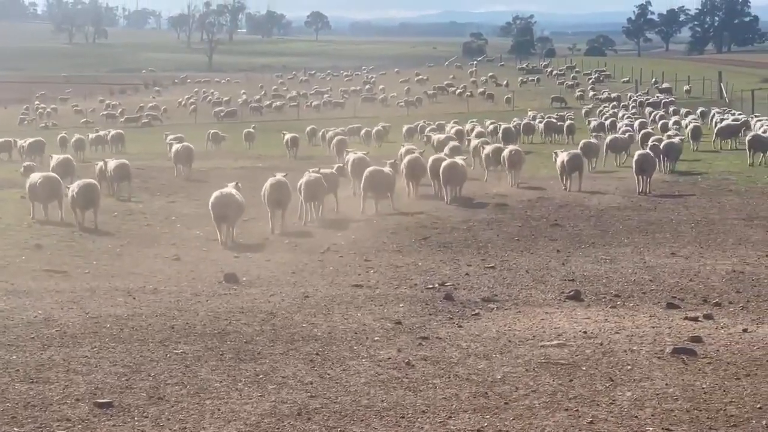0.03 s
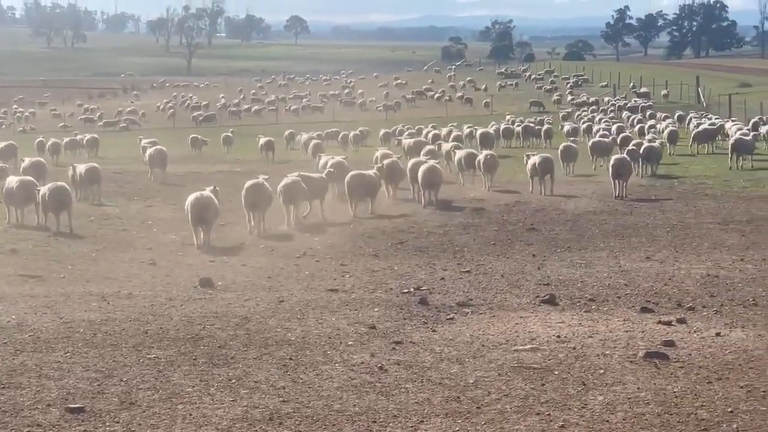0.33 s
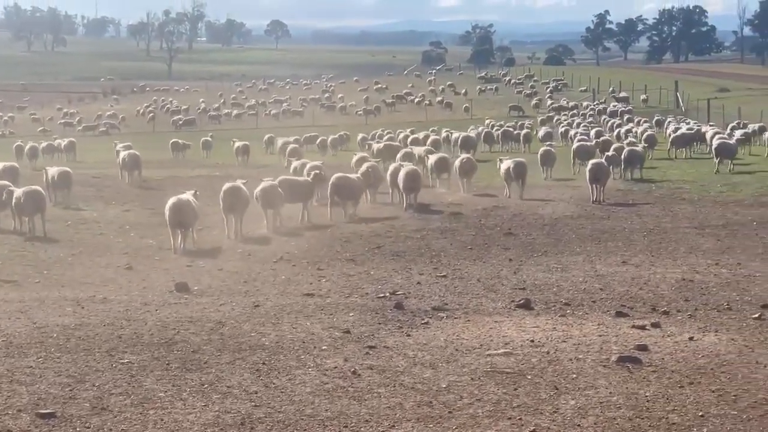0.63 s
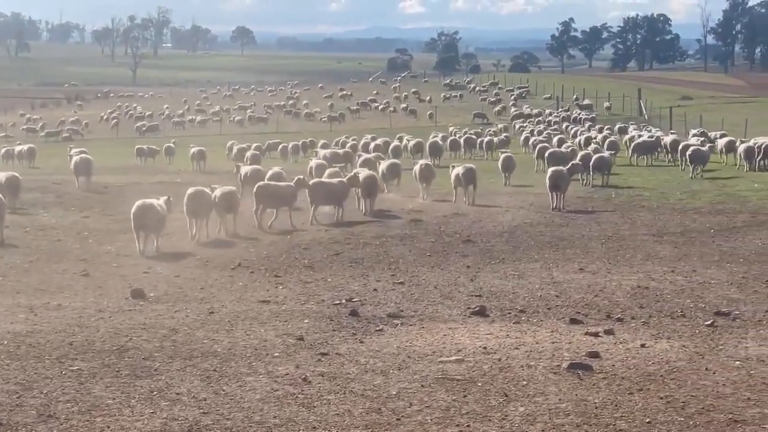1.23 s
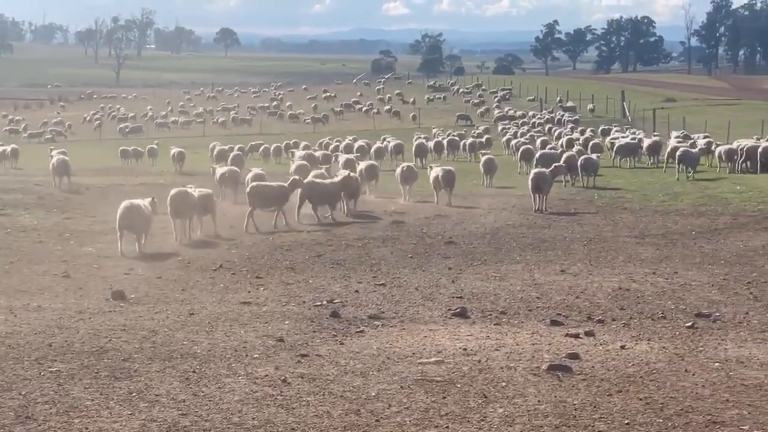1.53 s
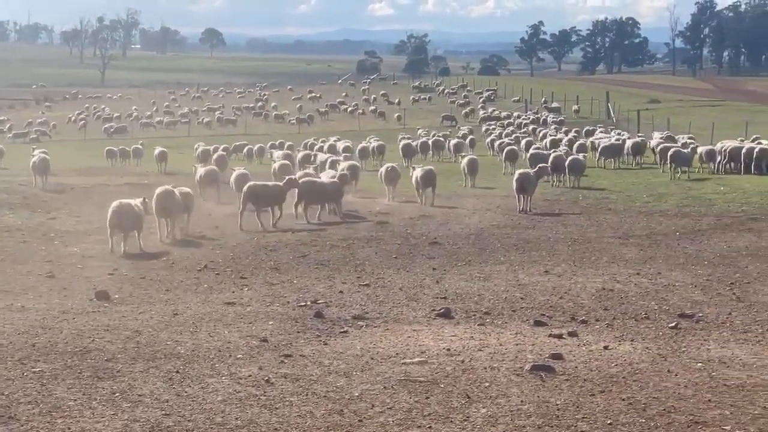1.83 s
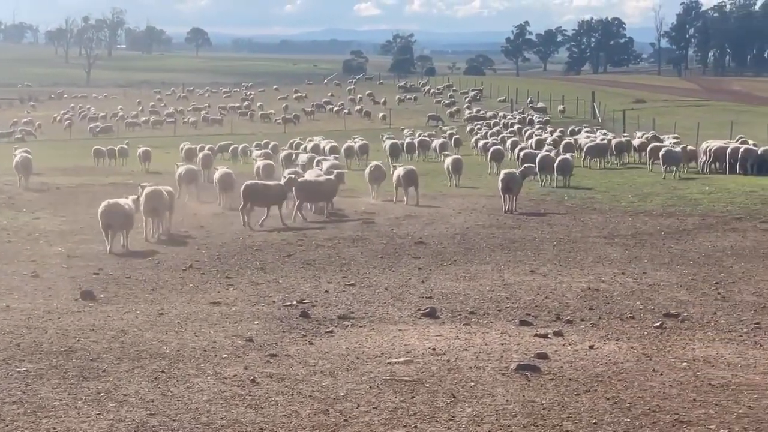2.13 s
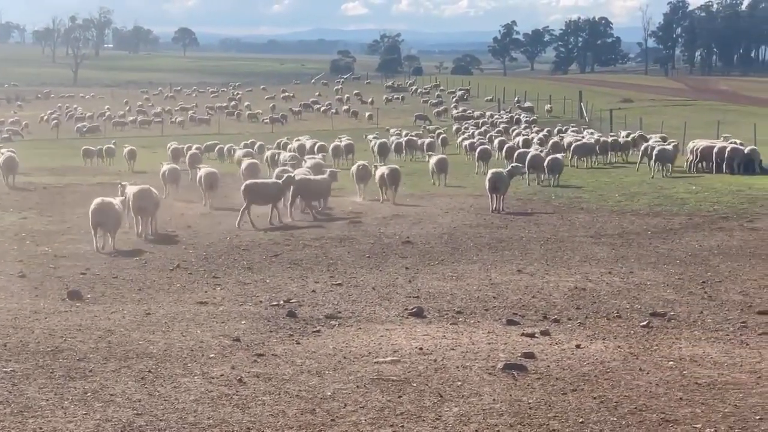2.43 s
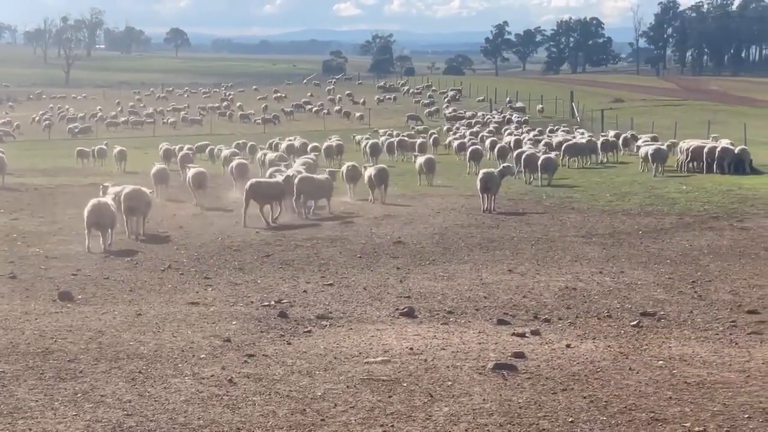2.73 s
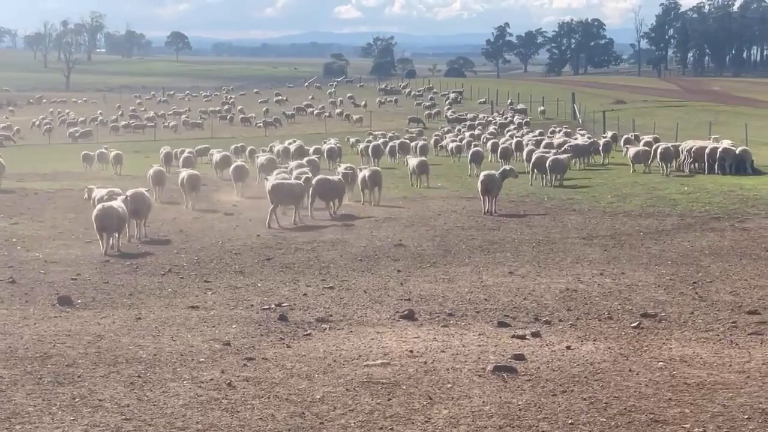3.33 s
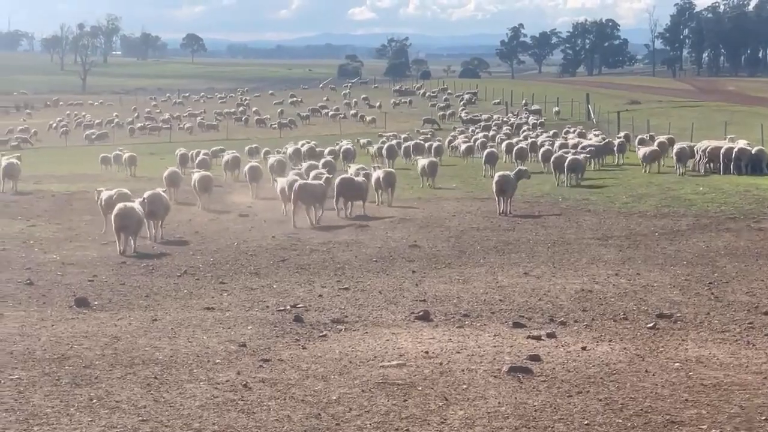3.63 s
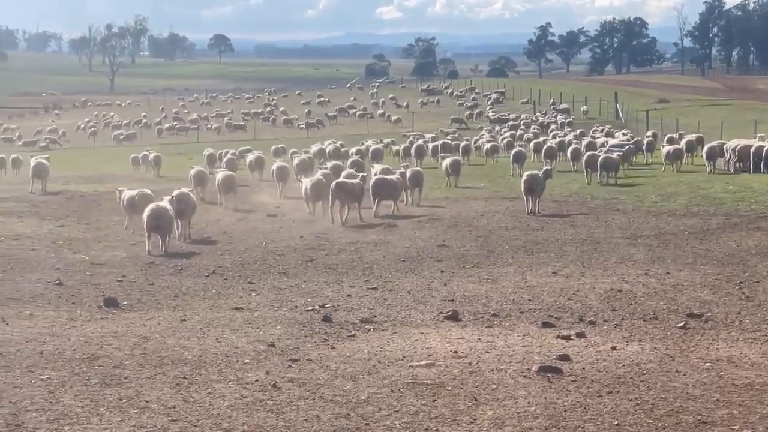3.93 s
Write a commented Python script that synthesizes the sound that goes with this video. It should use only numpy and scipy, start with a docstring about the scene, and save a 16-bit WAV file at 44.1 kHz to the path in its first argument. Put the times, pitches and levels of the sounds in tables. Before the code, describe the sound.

Sheep bleat across an open paddock, hoarse and nasal. One call lasts until about 0.7 seconds, another starts around 1.1, then four more overlap from 1.6 to about 3, the last trailing off softly toward 4. Wind rumbles and buffets the microphone throughout. Small, dull knocks sound close by near 0.5, 1.7 and 3.5 seconds, with very faint distant bird chirps behind.

```python
"""Sheep bleat across an open paddock: six hoarse, nasal, overlapping calls, the last trailing off.
In each, vocal-fold pulses and puffs of air ring a throat whose resonances rise as the mouth opens.
Wind buffets the microphone; a few small knocks and soft scuffs on dry earth sound close by.
Behind them: a faint far bird, insect-like ticking, a wash of flock and breeze, a thin high hiss."""
import sys
import numpy as np
from scipy import signal
from scipy.fft import rfft, irfft
from scipy.io import wavfile
from scipy.ndimage import map_coordinates

SR = 44100
rng = np.random.default_rng(int(sys.argv[2]) if len(sys.argv) > 2 else 0)


def output_pcm(signal):
    """Save a mono or channel-first signal as 16-bit PCM at the path in sys.argv[1].

    Samples are clipped to [-1, 1] before scaling.
    """
    pcm = np.clip(np.atleast_2d(signal).T, -1, 1) * 32767
    wavfile.write(sys.argv[1], SR, np.round(pcm).astype(np.int16))


N = 176400


def bleat(curve, throat, jitter=.0038, jitter_hz=45, shimmer=.2, puff_cycles=.55,
          quaver_db=1.3, quaver_hz=26, quaver_mouth=.007):
    """Vocal-fold pulses and air puffs ring a throat whose resonances rise as the mouth opens."""
    time_s, pitch_hz, level_db, roughness, mouth = np.transpose(curve)
    t = np.arange(time_s[0], time_s[-1], 1 / SR)
    n = np.arange(len(t))
    rough = np.clip(np.interp(t, time_s, roughness), 0, 1)
    hz = np.interp(t, time_s, pitch_hz) * (1 + jitter * (1 + 2 * rough) * wander(jitter_hz)[n])
    cycles = np.cumsum(hz) / SR
    phase = cycles % 1 - .5
    folds = np.sinc(phase * SR / hz / 2) * np.cos(np.pi * phase) ** 2
    folds *= 1 + shimmer * rng.standard_normal(SR)[cycles.astype(int)]
    puffs = (.3 + np.exp(-((cycles + .5) % 1) / puff_cycles)) * rng.standard_normal(len(t))
    drive = np.sqrt(1 - rough) * unit(folds - folds.mean()) + np.sqrt(rough) * unit(puffs)
    # a faster clock lifts every resonance
    clock = np.cumsum(np.interp(t, time_s, mouth) * (1 + quaver_mouth * wander(quaver_hz)[n]))
    warped = map_coordinates(drive, [np.interp(np.arange(clock[-1]), clock, n)])
    voice = unit(map_coordinates(colour(warped, throat), [clock]))
    effort_db = np.interp(t, time_s, level_db) + quaver_db * wander(quaver_hz)[n]
    out = np.zeros(N)
    add(out, time_s[0], amp(effort_db) * voice)
    return out


def flock(field_db=-9, field_t60_s=.7, rasp_hz=5100):
    """Six bleats with bright rasp and outdoor scatter, as they reach the two microphone ports."""
    # calls: time_s, pitch_hz, level_db, roughness (0-1), mouth (factor on the resonances)
    bleat_1 = [(.06, 159.9, -94, 0.3, 0.85), (.085, 163, -74, .7, 0.86), (.13, 167.8, -69.5, 0.83, 1.06),
               (.18, 174.6, -63, 0.17, 0.94), (.255, 179.3, -65, 0.14, 1.044), (.32, 175, -61.5, 0.3, 0.98),
               (.39, 168.3, -62.5, 0.29, 0.99), (.46, 167.2, -62, 0.31, 1.014),
               (.56, 159.9, -60, 0.5, 0.99), (.635, 160.7, -60, 0.8, 1.01), (.68, 147.5, -71.5, 0.5, 0.93)]
    bleat_2 = [(1.06, 154, -86, 0.88, 0.82), (1.1, 160.1, -74.5, 0.53, .92),
               (1.16, 171.1, -68.5, .08, 0.94), (1.22, 169.9, -67, 0.11, 1.03),
               (1.3, 167.4, -65.5, .06, 0.97), (1.4, 160.9, -66.5, 0.33, 1.02),
               (1.52, 154.7, -66.5, 0.47, 1.014), (1.63, 149.7, -66, 0.96, 1.01),
               (1.74, 141.8, -72, 0.69, 1.09)]
    bleat_3 = [(1.58, 160.2, -73, 1, 0.85), (1.66, 167.6, -69, 0.14, .96),
               (1.72, 180.1, -66.5, 0.06, 0.964), (1.76, 183.3, -65.5, 0.022, 1.01),
               (1.85, 180.1, -63.5, 0.071, 0.994), (1.95, 170, -65.5, 0.17, 1.01),
               (2.03, 162.7, -67.5, 0.36, 1.015), (2.12, 149.8, -72, 0.68, 1.1),
               (2.22, 140, -83.5, 0.89, 0.62)]
    bleat_4 = [(1.98, 150.9, -75.5, .4, 0.87), (2.05, 155, -69, 0.11, 0.96),
               (2.12, 152.4, -63, 0.033, 0.98), (2.2, 151.5, -63, 0.04, 0.99),
               (2.3, 148.2, -68, 0.13, 0.97), (2.42, 146, -69, 0.13, 0.98), (2.53, 139, -72, 0.15, 1),
               (2.66, 129.5, -73, 0.44, 0.936), (2.8, 122, -71.5, 0.3, 1)]
    bleat_5 = [(2.24, 150.4, -74, 0.56, .94), (2.32, 153.4, -66.5, 0.59, .96),
               (2.45, 151.6, -64.5, 0.57, 1), (2.6, 148.3, -66.5, 0.31, 0.94),
               (2.69, 143.6, -70.5, 0.074, 0.99), (2.75, 141.3, -65.5, 0.023, 1.05),
               (2.85, 140.5, -66, .03, 0.98), (2.95, 137, -71, 0.061, 0.95), (3.1, 137, -74.5, 0.066, .97),
               (3.25, 134.7, -84.5, 0.058, 0.94), (3.7, 133.6, -85.5, 0.091, 0.91),
               (4, 133.7, -93.5, .2, 0.85)]
    bleat_6 = [(2.28, 187.7, -78, .8, 0.97), (2.38, 199.5, -75.5, 0.6, 1), (2.48, 196.7, -71.5, 0.54, 1),
               (2.58, 190, -77, 0.49, 0.96), (2.7, 172, -83.5, 1, 0.88)]
    # throat and mouth responses: freq_hz, gain_db
    throat_1 = [(400, -34), (1020, -12), (1390, 10.5), (1620, -4), (1850, -2), (2150, 9), (2330, -5.5),
                (2500, -5.5), (2750, -21), (2980, -9.5), (3250, -20.5), (3530, -1), (3800, -22),
                (4300, -41.5), (5500, -28), (6300, -10.5), (7800, -49.5)]
    throat_2 = [(400, -38), (900, -19), (1190, 6.5), (1380, -5), (1620, -6), (1900, 8), (2300, -21.5),
                (2560, -7), (2700, -22.5), (3020, 1), (3400, -32), (4600, -34), (7000, -52.5)]
    throat_3 = [(400, -40.5), (1020, -8.5), (1360, 15), (1680, -10), (2060, 15.5), (2450, -12), (2800, -12),
                (3350, -2.5), (3900, -48), (5400, -36), (6050, -4.5), (6450, -22), (7400, -52)]
    throat_4 = [(400, -54), (1020, -6), (1360, 15), (1620, -11), (2120, 13), (2500, -6.5), (2950, -16.5),
                (3350, -2.5), (3850, -17), (4300, -11.5), (5300, -38.5), (6300, -8), (6900, -27.5),
                (7400, -15.5), (8200, -54.5)]
    throat_5 = [(400, -40.5), (900, -23), (1210, 3.5), (1400, -10), (1800, 4), (2100, -8.5), (2400, -33),
                (2980, -6.5), (3450, -42.5), (4200, -22.5), (5000, -49.5), (7000, -49.5)]
    throat_6 = [(400, -41), (1000, -11.5), (1450, -0.5), (1700, -8.5), (2080, 0.5), (2350, -9), (2650, 6),
                (3000, -17), (3400, 0), (3900, -17), (4350, -7.5), (5000, -34), (7000, -54.5)]
    # treble above rasp_hz: time_s, gain_db
    rasp_gain = [(.1, -8), (.3, -4), (.62, -6), (.75, -11), (1.7, -22.5), (1.85, -5), (2.08, 9), (2.16, 2),
                 (2.26, -13), (2.5, -28)]
    # port balance: freq_hz, left_minus_right_db
    pan = [(500, 0), (1000, -3), (1350, -5), (1850, -3), (2050, -.2), (6000, 0)]
    # port phase: freq_hz, left_lead_rad
    lead = [(500, -.5), (1000, -2.6), (1400, -1.9), (1800, 0), (3000, 0)]
    calls = (bleat(bleat_1, throat_1) + bleat(bleat_2, throat_2) + bleat(bleat_3, throat_3)
             + bleat(bleat_4, throat_4) + bleat(bleat_5, throat_5) + bleat(bleat_6, throat_6))
    calls += amp(field_db) * scatter(calls, field_t60_s)
    rasp = signal.sosfiltfilt(signal.butter(4, rasp_hz, "high", fs=SR, output="sos"), calls)
    calls += rasp * (level(rasp_gain) - 1)
    hz = np.fft.rfftfreq(N, 1 / SR)
    left = amp(read(pan, hz) / 2) * np.exp(.5j * read(lead, hz))
    return irfft(rfft(calls) * np.array([left, 1 / left]), N)


def wind(flutter_db=2.5, spread=.35):
    """Wind on the microphone: lumpy rumble, plus buffets that strike the two ports unequally."""
    # rumble spectrum: freq_hz, density_db
    rumble = [(15, -40), (28, -23), (45, 4), (68, 2), (100, -3), (135, -11), (200, -20), (300, -28.5),
              (450, -37), (800, -49.5), (2000, -83.5)]
    # rumble strength: time_s, level_db
    strength = [(0, -39), (.6, -48), (1.1, -44), (1.6, -48.5), (2.1, -47), (2.5, -45), (2.9, -43),
                (3.15, -46), (3.7, -44.5), (4, -50)]
    # buffets: centre_s, level_db, pitch_hz, half_width_s
    buffets = [(0.034, -32, 81, 0.0073), (0.139, -31.5, 68, 0.0071), (0.245, -33, 78, 0.018),
               (0.387, -38, 72.7, 0.019), (.59, -39.5, 132, 0.011), (0.636, -41.5, 101.6, 0.019),
               (0.852, -38.5, 69.7, 0.038), (0.953, -25.5, 97, 0.0077), (0.978, -31.5, 68, 0.014),
               (1.136, -34.5, 53, 0.024), (1.235, -31.5, 53.6, 0.024), (1.366, -37, 70, 0.022),
               (1.46, -34.5, 72, 0.014), (1.6, -38.5, 63, 0.018), (1.681, -34, 57.3, 0.02),
               (1.672, -40, 131, 0.016), (1.758, -29.5, 67.3, 0.019), (1.745, -37, 131.4, 0.0087),
               (2.265, -34.5, 61.3, 0.03), (2.419, -31, 64.4, 0.0074), (2.698, -35.5, 54, 0.031),
               (2.86, -47, 150, 0.024), (2.894, -32.5, 74, 0.023), (3.271, -34.5, 52.3, 0.019),
               (3.326, -37, 64, 0.011), (3.463, -35.5, 69, 0.023), (3.687, -37.5, 55.2, 0.039)]
    out = noise(rumble, correlation=.72) * level(strength) * unit(amp(flutter_db * wander(hz=23.6)))
    for centre_s, level_db, pitch_hz, half_width_s in buffets:
        mid = burst(pitch_hz, half_width_s)
        side = spread * burst(pitch_hz, half_width_s)
        add(out, centre_s - .5, amp(level_db) * np.array([mid + side, mid - side]))
    return out


def knocks(tail_t60_s=.16, click_decay_s=.0055, click_lead_s=.0026):
    """Short dull knocks, each with a click in front and a brief tail."""
    # knocks: centre_s, level_db, pitch_hz, half_width_s, left_minus_right_db, tail_rel_db, click_rel_db
    hits = [(0.5198, -36.5, 1140, 0.0015, -15.5, -0.5, -58), (1.739, -36, 180, 0.0061, 3, -20, -34),
            (1.735, -42, 355, 0.0043, 4.5, -31, -25), (3.422, -62, 770, 0.0015, 0, -5.5, -29),
            (3.465, -42.5, 855, 0.0024, 5.5, -14.5, -9.5), (3.469, -50, 552, 0.0035, 1, -9, -29),
            (3.545, -44, 526, 0.0025, 4, -11, -51)]
    # click spectrum: freq_hz, gain_db
    click_spectrum = [(300, -4.5), (1200, 8.5), (3500, -6.5), (6000, -29), (11000, -40.5)]
    out, t = np.zeros((2, N)), np.arange(SR) / SR
    for centre_s, level_db, pitch_hz, half_width_s, pan_db, tail_rel_db, click_rel_db in hits:
        body = amp(level_db) * burst(pitch_hz, half_width_s)
        tails = np.array([scatter(body, tail_t60_s), scatter(body, tail_t60_s)])
        add(out, centre_s - .5, body * amp([[pan_db / 2], [-pan_db / 2]]) + amp(tail_rel_db) * tails)
        click = unit(colour(rng.standard_normal(SR), click_spectrum)) * np.exp(-t / click_decay_s)
        add(out, centre_s - click_lead_s, amp(level_db + click_rel_db) * click)
    return out


def scuffs(grain_db=1.2):
    """Soft scuffs on dry earth: brief swells of grainy noise."""
    # scuffs: centre_s, half_width_s, level_db, peak_hz
    swells = [(0.55, 0.043, -62.5, 1010), (0.625, 0.061, -65, 448), (0.629, 0.028, -65, 1700),
              (3.591, 0.13, -74, 887), (3.773, 0.1, -76, 904)]
    t, out = np.arange(N) / SR, np.zeros((2, N))
    for centre_s, half_width_s, level_db, hz in swells:
        spectrum = [(hz / 4, -14), (hz, 0), (hz * 1.16, -8), (hz * 3, -30), (hz * 7, -70)]
        envelope = amp(level_db) * np.exp(-((t - centre_s) / half_width_s) ** 2)
        out += noise(spectrum, correlation=.9) * envelope
    return out * amp(grain_db * wander(hz=196))


def bird(wobble_depth=.027, tail_db=-2):
    """Faint sliding whistles, blurred by distance."""
    # chirps: start_s, length_s, from_hz, to_hz, level_db
    chirps = [(0.17, 0.039, 4100, 3700, -80), (0.747, .12, 3730, 2330, -76.5),
              (0.898, 0.043, 3350, 2970, -83), (0.966, 0.051, 3300, 2780, -85.5),
              (1.226, .03, 3500, 3850, -75.5), (1.273, 0.033, 3600, 4000, -77.5),
              (1.358, 0.03, 4250, 3860, -81.5), (1.417, 0.052, 3700, 3850, -82),
              (1.585, 0.067, 3900, 3480, -76.5), (2.469, 0.075, 3300, 2600, -74),
              (3.372, 0.022, 3100, 3460, -75), (3.751, 0.14, 2600, 2270, -78)]
    out, wobble = np.zeros(N), wander(hz=142)
    for start_s, length_s, from_hz, to_hz, level_db in chirps:
        progress = np.arange(0, 1, 1 / (length_s * SR))
        hz = from_hz + (to_hz - from_hz) * progress
        hz *= 1 + wobble_depth * np.roll(wobble, -round(start_s * SR))[:len(hz)]
        whistle = np.sin(2 * np.pi * np.cumsum(hz) / SR)
        add(out, start_s, amp(level_db) * np.sin(np.pi * progress) * whistle)
    return out + amp(tail_db) * scatter(out, t60_s=.23)


def ticking(pitch_hz=9900, fall_hz_per_s=26000, half_width_s=.01,
            period_s=.083, jitter_s=.006, spread_db=2.8):
    """A loose run of tiny fizzy ticks, each falling in pitch, like an insect in the grass."""
    # tick strength: time_s, level_db
    strength = [(0, -89.5), (1.2, -85), (2.5, -97.5), (2.95, -79), (3.6, -81), (4, -87)]
    t, out = np.arange(-period_s / 2, period_s / 2, 1 / SR), np.zeros((2, N))
    cycles = np.cumsum(pitch_hz - fall_hz_per_s * t) / SR
    tick = np.exp(-(t / half_width_s) ** 2) * np.cos(2 * np.pi * cycles)
    for centre_s in np.arange(0, N / SR, period_s):
        late, loud = rng.standard_normal(2)
        add(out, centre_s + t[0] + jitter_s * late, amp(spread_db * loud) * tick)
    fizz = noise([(200, -3.5), (450, -7.5), (1000, -38.5)], correlation=.87)
    return out * fizz * level(strength)


def wash(flutter_db=1.4):
    """Distant noise of the moving flock and the breeze."""
    # wash spectrum: freq_hz, density_db
    spectrum = [(100, -15.5), (300, 5), (550, -2), (750, 1.5), (1100, 4.5), (1600, -5), (2200, -9),
                (3200, -13.5), (4300, -21), (6500, -22.5), (8000, -32), (12000, -65)]
    # wash strength: time_s, level_db
    strength = [(0, -81.5), (.45, -71), (.62, -69), (.78, -70.5), (1.05, -74), (1.8, -73), (2.5, -72),
                (3.2, -75.5), (3.7, -77.5), (4, -81)]
    # left-right likeness: freq_hz, correlation
    likeness = [(300, 0.21), (600, 0.19), (980, -0.6), (1700, 0.7), (2500, 1), (8000, 0.92)]
    correlation = read(likeness, np.fft.rfftfreq(N, 1 / SR))
    return noise(spectrum, correlation) * level(strength) * amp(flutter_db * wander(hz=26.8))


def hiss(level_db=-88, flicker_db=2.6):
    """Thin, high, flickering hiss."""
    # hiss spectrum: freq_hz, density_db
    spectrum = [(2500, -16), (4500, -10), (7900, -2.5), (8700, 8.5), (10100, 6.5), (10700, -14),
                (11500, -7.5), (12500, -44.5)]
    return amp(level_db + flicker_db * wander(hz=25)) * noise(spectrum, correlation=-.28)


def amp(db):
    """Decibels to gain."""
    return 10 ** (np.asarray(db) / 20)


def unit(x):
    """Scales to rms 1."""
    return x / np.sqrt(np.mean(x ** 2) + 1e-20)


def read(points, hz):
    """Interpolates (freq_hz, value) points on a log-frequency axis."""
    freq_hz, value = np.transpose(points)
    return np.interp(np.log(hz + 1), np.log(freq_hz + 1), value)


def level(points):
    """Gain over the scene from (time_s, level_db) points."""
    return amp(np.interp(np.arange(N) / SR, *np.transpose(points)))


def add(mix, start_s, sound):
    """Mixes a sound in at start_s."""
    start = round(start_s * SR)
    sound = sound[..., max(-start, 0):]
    part = mix[..., max(start, 0):][..., :sound.shape[-1]]
    part += sound[..., :part.shape[-1]]


def wander(hz):
    """Random motion of rms 1, up to about hz."""
    lowpass = np.exp(-(np.fft.rfftfreq(N, 1 / SR) / hz) ** 2)
    return unit(irfft(rfft(rng.standard_normal(N)) * lowpass, N))


def colour(x, spectrum, size=4096):
    """Minimum-phase filter: each pulse rings after it strikes."""
    log_gain = np.log(amp(read(spectrum, abs(np.fft.fftfreq(size, 1 / SR)))))
    taps = np.fft.ifft(np.exp(np.conj(signal.hilbert(log_gain)))).real[:size // 2]
    return signal.oaconvolve(x, taps)[:len(x)]


def noise(spectrum, correlation):
    """Stereo noise of rms 1 with a given spectrum and left-right correlation."""
    a, b = rfft(rng.standard_normal((2, N)))
    correlation = np.clip(correlation, -1, 1)
    mid, side = a * np.sqrt(1 + correlation), b * np.sqrt(1 - correlation)
    gain = amp(read(spectrum, np.fft.rfftfreq(N, 1 / SR)))
    return unit(irfft(np.array([mid + side, mid - side]) * gain, N))


def scatter(x, t60_s):
    """Convolves with a diffuse outdoor tail of energy 1."""
    t = np.arange(SR) / SR
    tail = rng.standard_normal(SR) * np.exp(-np.log(1000) * t / t60_s)
    return signal.fftconvolve(x, tail / np.linalg.norm(tail))[:len(x)]


def burst(hz, half_width_s):
    """A few cycles under a Gaussian envelope, centred in a 1 s buffer."""
    t = np.arange(SR) / SR - .5
    return np.exp(-(t / half_width_s) ** 2) * np.cos(2 * np.pi * (hz * t + rng.random()))


def scene():
    """Everything at the microphone."""
    return flock() + wind() + knocks() + scuffs() + bird() + ticking() + wash() + hiss()


def record(dry, cutoff_hz=11600):
    """Steep low-pass band limit."""
    taps = signal.firwin(511, cutoff_hz, window=("kaiser", 9), fs=SR)
    return signal.oaconvolve(dry, taps[None], "same")


dry = scene()
out = record(dry)
output_pcm(out)
```